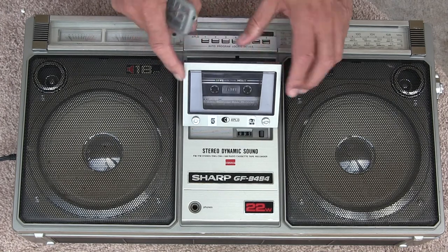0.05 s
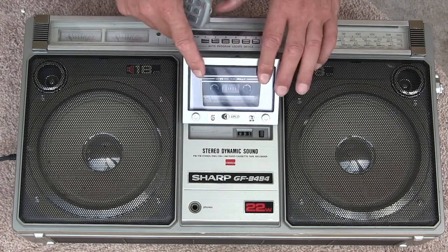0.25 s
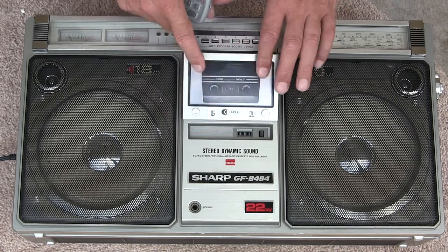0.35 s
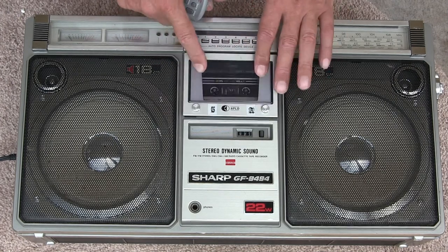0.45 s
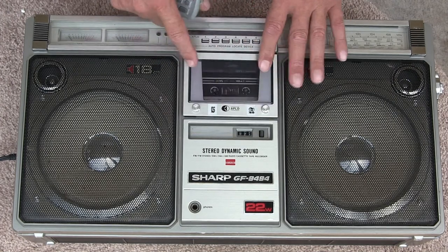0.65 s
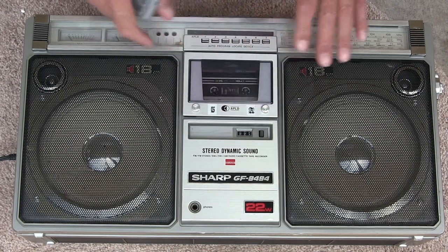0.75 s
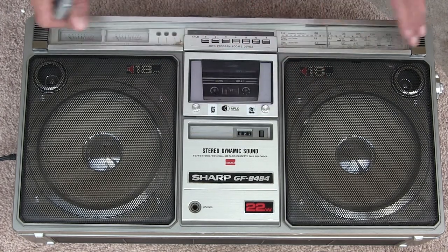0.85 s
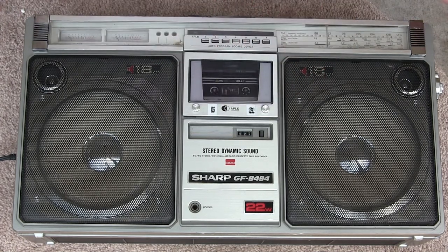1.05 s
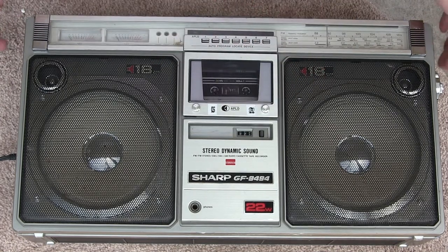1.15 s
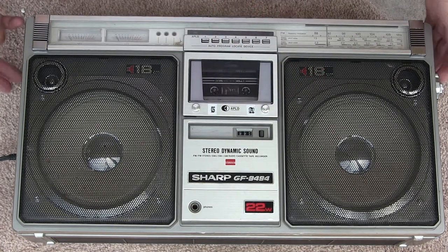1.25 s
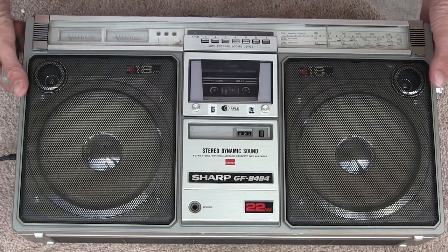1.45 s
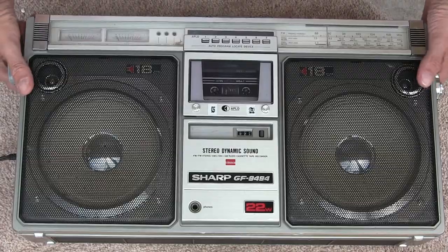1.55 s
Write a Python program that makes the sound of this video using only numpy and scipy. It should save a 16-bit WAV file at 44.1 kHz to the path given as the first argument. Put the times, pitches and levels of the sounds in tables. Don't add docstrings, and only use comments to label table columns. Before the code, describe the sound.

A plastic cassette door snaps shut with one sharp, hollow click in a quiet, humming room

```python
import sys
import numpy as np
from scipy import signal
from scipy.fft import rfft, irfft, next_fast_len
from scipy.io import wavfile
from scipy.ndimage import uniform_filter1d, map_coordinates

SR = 44100
rng = np.random.default_rng(int(sys.argv[2]) if len(sys.argv) > 2 else 0)


def nominal_scale(level):
    x = np.asarray(level, float) / 20
    return 10 ** x


def bounce(signal):
    frames = np.transpose(np.atleast_2d(signal))
    limited = np.clip(frames, -1, 1)
    pcm = np.round(limited * 32767).astype(np.int16)
    wavfile.write(sys.argv[1], SR, pcm)


N = 70560
T = np.arange(N) / SR

# hz, density_db_per_hz
AIR_SPECTRUM = [(100, 2), (170, -13.5), (300, -9), (420, -15.5), (620, -20), (1900, -32), (5000, -37.5),
                (15700, -50.5)]
# hz, density_db_per_hz
RUMBLE_SPECTRUM = [(20, 10), (30, -0.5), (42, -2), (65, -10), (90, -17), (130, -51)]
# time_s, level_db
RUMBLE_LEVEL = [(0.0, -47), (0.08, -34.5), (0.196, -54), (0.218, -34.5), (0.582, -37.5), (0.762, -43),
                (0.788, -40), (0.934, -45), (1.038, -33.5), (1.09, -46), (1.322, -46), (1.344, -31.5),
                (1.398, -40.5), (1.6, -48)]
# centre_hz, width_hz, level_db
WHINE_BANDS = [(7930, 70, -83.5), (15735, 40, -82)]
# pitch_hz, rms_db, left_over_right_db
HUM_TONES = [(64.24, -45.5, -6), (94.5, -56.5, 3), (118.3, -68.5, 8), (172.9, -68.5, -6), (237, -62.5, 1),
             (311.5, -68.5, -10), (358, -71, -11.5), (415, -72, 0), (561, -74.5, 0)]
# top_s, half_length_s, level_db
SLEEVE_SWELLS = [
    (.0, 0.038, -62.5),
    (0.317, 0.01, -59.5),
    (0.974, 0.018, -58),
    (1.058, 0.045, -59.5),
    (1.252, 0.072, -62.5),
    (1.352, 0.051, -63.5),
    (1.43, 0.034, -71.5),
    (1.544, 0.044, -61),
]
# hz, density_db_per_hz
CLOTH_SPECTRUM = [(300, -16), (800, 5), (1500, 2.5), (3000, -1.5), (6000, -4), (9000, -10), (15000, -21.5)]
# start_s, snap_peak_db, boom_over_snap_db, snap_t60_s, left_over_right_db
CATCH_CONTACTS = [(0.443, -51, 2, 0.04, 1), (0.4505, -27.5, 3.5, 0.028, -5.5), (0.4611, -24, 3, 0.026, -1),
                  (0.466, -30.5, 11, 0.032, 9), (.4760, -30.5, 8, 0.042, -6),
                  (0.4817, -17.5, -1, 0.017, -11), (.4853, -6, 3, 0.015, 2), (.4930, -21.5, 4.5, 0.02, 3),
                  (0.305, -56, 16, 0.012, 9), (.313, -58, 20.5, 0.017, 0), (.69, -63, 23.5, .08, 11),
                  (.962, -59, 17, 0.033, 2)]
# start_s, peak_db, pitch_hz, t60_s
FINGER_TOUCHES = [
    (.250, -39.5, 750, 0.013),
    (.258, -43, 710, 0.029),
    (.266, -47.5, 740, 0.043),
    (.330, -46, 480, 0.053),
    (.045, -59.5, 755, 0.18),
]
# pitch_hz, level_db, t60_s, left_over_right_db
CASE_MODES = [(342.5, -9.5, 0.078, 17), (378.3, -4, 0.073, -5.5), (452.4, -3, 0.093, 7),
              (525, -4.5, 0.036, 10.5), (611.6, 0.5, 0.033, 2.5), (684.7, 1.5, 0.024, 7.5),
              (764, -0.5, 0.029, 3.5), (863, -8, 0.024, 13), (1047, -15, 0.035, -1),
              (1166, -13.5, 0.037, 2), (1280, -13.5, 0.028, 1), (2301, -16.5, 0.019, -10.5)]
# centre_hz, width_hz, level_db
PANEL_MODES = [(2480, 800, -19.5), (3955, 167, -0.5), (4960, 100, -9.5), (6000, 440, 1), (8800, 500, -17),
               (10830, 880, -7)]
# hz, level_db
SNAP_SPECTRUM = [(300, -10), (800, -12), (1500, -3), (3000, -1.5), (4800, -1.5), (8000, -5), (14000, -12),
                 (16200, -38)]
# hz, left_over_right_db
SNAP_LEAN = [(500, -16.5), (1200, -9), (2500, 1), (6000, -6), (9000, 3.5), (15000, 3)]
# hz, t60_s
ROOM_DECAY = [(300, 0.37), (1000, 0.27), (4000, 0.17), (8000, 0.2), (14000, 0.16)]
# hz, level_db
ROOM_TINT = [(300, -2.5), (800, -5), (1600, 2.5), (5000, -0.5), (10000, -2.5), (15000, -5)]

AIR_DB, RUMBLE_OPPOSED = -55.5, 0.22
HUM_SWAY_DB, HUM_DRIFT_RAD = 1, 1.014
MAINS_HZ, MAINS_FIRST_S = 59.96, .00062
BUZZ_DB, BUZZ_HZ, BUZZ_WIDTH_HZ, BUZZ_SCATTER_DB = -41.5, 4020, 4340, 1.4
SNAP_RISE_S, BOOM_LAG_S, BOOM_RISE_S = .00035, .0007, .0008
SNAP_ALIKE = 0.36
TREBLE_FADES = 1.4
PANEL_DB, PANEL_TO_ROOM, CASE_LOW_HZ = 9, 0.58, 281
ROOM_DB, ROOM_GAP_S = -8, .005
STEADY_TOP_HZ, SNAP_TOP_HZ = 15850, 16150


def unit(x):
    return x / np.sqrt(np.mean(x ** 2, axis=-1, keepdims=True) + 1e-20)


def along(points, hz):
    f, v = np.transpose(points)
    return np.interp(np.log(hz + 1), np.log(f + 1), v)


def curve(rows):
    return np.interp(T, *np.transpose(rows))


def sides(db):
    return nominal_scale(np.multiply.outer([.5, -.5], db))


def wobble(rate_hz):
    knots = rng.standard_normal((2, int(N * rate_hz / SR) + 4))
    return np.array([map_coordinates(k, [T * rate_hz]) for k in knots])


def filtered(x, response):
    m = next_fast_len(N + SR // 2)
    return irfft(rfft(x, m) * response(np.fft.rfftfreq(m, 1 / SR)), m)[..., :N]


def peak(f, hz, width_hz):
    return 1j * f * width_hz / (hz * hz - f * f + 1j * f * width_hz)


def noise(spectrum):
    first_hz, first_db = spectrum[0]
    closed = [(first_hz * .5, first_db - 40)] + list(spectrum)
    return unit(filtered(rng.standard_normal((2, N)), lambda f: nominal_scale(along(closed, f))))


def whine():
    total = 0
    for hz, width_hz, db in WHINE_BANDS:
        hiss = rng.standard_normal((2, N))
        total = total + nominal_scale(db) * unit(filtered(hiss, lambda f: peak(f, hz, width_hz) ** 2))
    return total


def air():
    rumble_level = nominal_scale(curve(RUMBLE_LEVEL) + 0.5 + 0.37 * wobble(2.8))
    rumble = rumble_level * noise(list(RUMBLE_SPECTRUM) + [(200, -68.5)])
    hiss = nominal_scale(AIR_DB + 5.5 + 1.5 * wobble(6.24)) * noise(AIR_SPECTRUM)
    return hiss + rumble - RUMBLE_OPPOSED * rumble[::-1] + whine()


def hum():
    total = np.zeros((2, N))
    for hz, db, lean_db in HUM_TONES:
        level = nominal_scale(db + 5 + HUM_SWAY_DB * wobble(5)) * sides(lean_db)[:, None]
        phase = 2 * np.pi * hz * T + HUM_DRIFT_RAD * wobble(6) + [[0], [1.9]]
        total += level * np.sin(phase)
    return total


def buzz():
    k = np.arange(int(2 * MAINS_HZ * N / SR))
    at = np.round((MAINS_FIRST_S + k / MAINS_HZ / 2) * SR).astype(int)
    spikes = np.zeros(N)
    spikes[at] = (-1.) ** k * nominal_scale(BUZZ_SCATTER_DB * rng.standard_normal(len(k)))

    def cable(f):
        return peak(f, BUZZ_HZ, BUZZ_WIDTH_HZ) ** 2 * peak(f, 0.62 * BUZZ_HZ, 2 * BUZZ_WIDTH_HZ)

    left = filtered(spikes, cable)
    return nominal_scale(BUZZ_DB + 10.5) * np.array([left, 0 * left])


def sleeves():
    swell = sum(nominal_scale(db) * np.exp(-.5 * ((T - s) / half_s) ** 2) for s, half_s, db in SLEEVE_SWELLS)
    return swell * nominal_scale(0.88 * wobble(40) + 0.78 * wobble(330)) * noise(CLOTH_SPECTRUM)


def ring(t, hz, t60_s, phase):
    return nominal_scale(-60 * t / t60_s) * np.sin(2 * np.pi * hz * t + phase) * (1 - np.exp(-t / BOOM_RISE_S))


def snap(t, db, t60_s, lean_db):
    grit = rng.standard_normal((3, len(t)))
    grit = SNAP_ALIKE * grit[0] + np.sqrt(1 - SNAP_ALIKE ** 2) * grit[1:]
    dull = uniform_filter1d(grit, size=3, axis=1)
    grit = dull + (grit - dull) * nominal_scale(-60 * (TREBLE_FADES - 1) * t / t60_s)
    envelope = nominal_scale(db + 3 - 60 * t / t60_s) * (1 - np.exp(-t / SNAP_RISE_S))
    return envelope * sides(lean_db)[:, None] * grit


def case_boom(t, db):
    late = np.maximum(t - BOOM_LAG_S, 0)
    total = np.zeros((2, len(t)))
    for k, (hz, mode_db, t60_s, side_db) in enumerate(CASE_MODES):
        scatter, left, right = rng.standard_normal(3)
        phase = np.pi * k + 0.36 * np.array([[left], [right]])
        total += nominal_scale(db - 13 + mode_db + 1.6 * scatter) * sides(side_db) [:, None] * ring(late, hz, t60_s, phase) \
            if np.ndim(side_db) == 0 else 0
    return total


def panel_response(f):
    total = 0
    for k, (hz, width_hz, db) in enumerate(PANEL_MODES):
        total = total + (-1) ** k * nominal_scale(db + PANEL_DB) * peak(f, hz, width_hz)
    return total


def door():
    snaps, boom = np.zeros((2, N + SR)), np.zeros((2, N + SR))
    t = np.arange(SR // 4) / SR
    for s, db, boom_db, t60_s, lean_db in CATCH_CONTACTS:
        at = slice(round(s * SR), round(s * SR) + len(t))
        snaps[:, at] += snap(t, db, t60_s, lean_db)
        boom[:, at] += case_boom(t, db + boom_db)
    for s, db, hz, t60_s in FINGER_TOUCHES:
        at = slice(round(s * SR), round(s * SR) + len(t))
        boom[:, at] += nominal_scale(db) * ring(t, hz, t60_s, 0)
    leaning = filtered(snaps[:, :N], lambda f: sides(along(SNAP_LEAN, f)))
    broad = filtered(snaps[:, :N], lambda f: sides(along(SNAP_LEAN, f)) * nominal_scale(along(SNAP_SPECTRUM, f)))
    panel = filtered(snaps[:, :N], lambda f: sides(along(SNAP_LEAN, f)) * panel_response(f))
    rest = broad + filtered(boom[:, :N], lambda f: (1j * f / (CASE_LOW_HZ + 1j * f)) ** 4 * 1.83)
    return rest + panel, rest + PANEL_TO_ROOM * panel


def room(x):
    hz, t, z = signal.stft(rng.standard_normal((2, SR // 2)), SR, nperseg=256)
    fade = nominal_scale(-60 * t / along(ROOM_DECAY, hz)[:, None])
    tail = signal.istft(z * fade, SR, nperseg=256)[1]
    tinted = filtered(x, lambda f: nominal_scale(along(ROOM_TINT, f)))
    late = np.pad(tinted, ((0, 0), (round(ROOM_GAP_S * SR), 0)))
    return nominal_scale(ROOM_DB) * signal.fftconvolve(late, tail / np.linalg.norm(tail[0]), axes=1)[:, :N]


def scene():
    steady = filtered(air() + hum() + buzz() + sleeves(), lambda f: f < STEADY_TOP_HZ)
    direct, feed = door()
    shut = direct + room(feed)
    return steady + filtered(shut, lambda f: f < SNAP_TOP_HZ)


def band_limit(x):
    return signal.sosfilt(signal.butter(12, 16460, fs=SR, output="sos"), x)


def record(dry):
    return band_limit(dry)


dry = scene()
out = record(dry)
bounce(out)
```